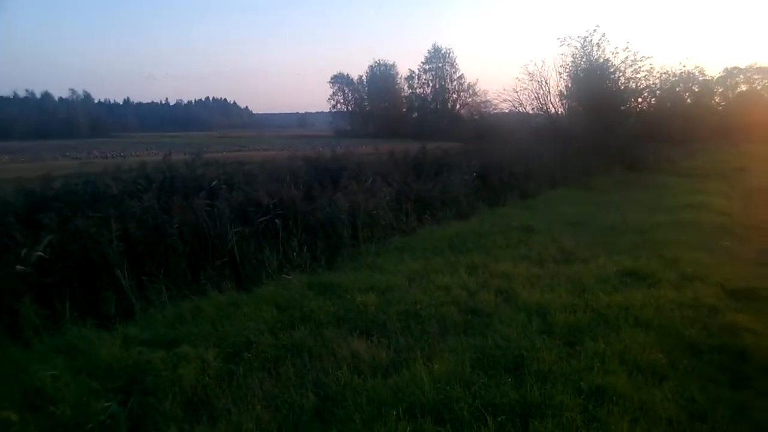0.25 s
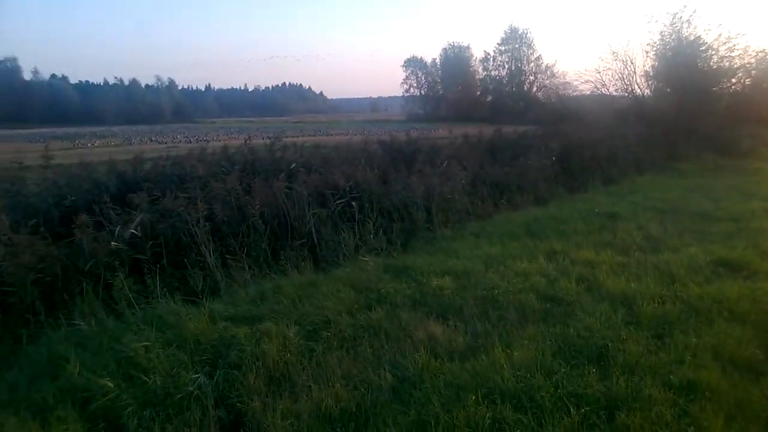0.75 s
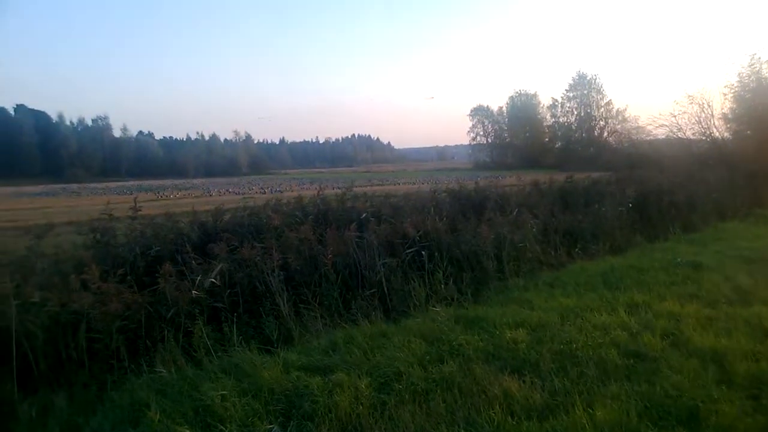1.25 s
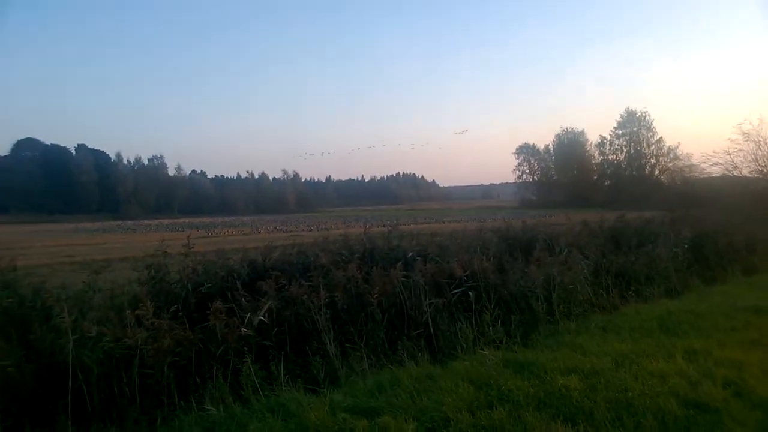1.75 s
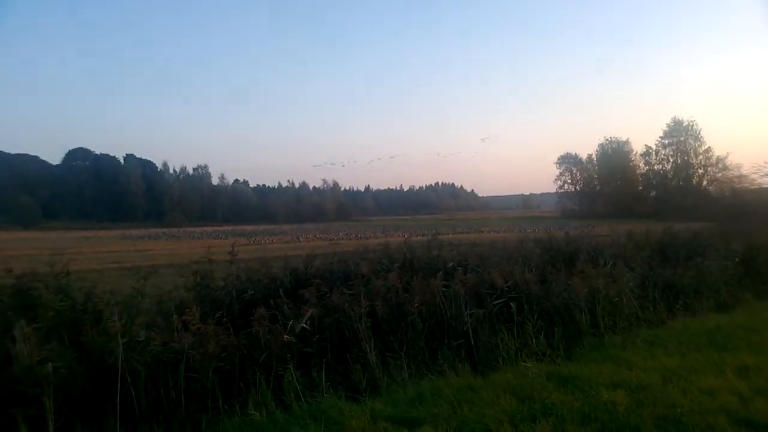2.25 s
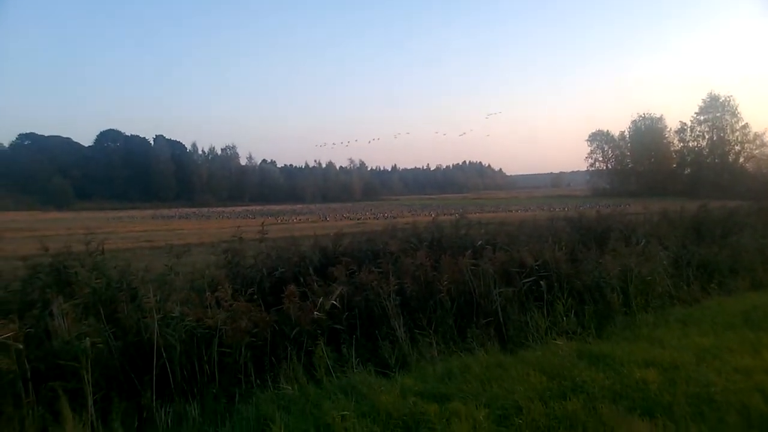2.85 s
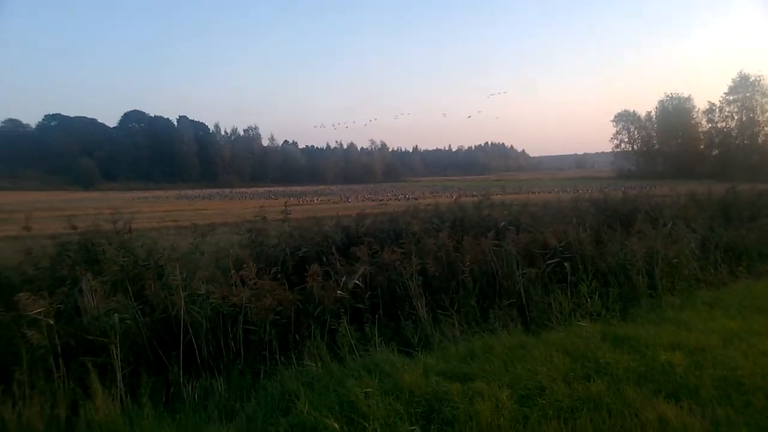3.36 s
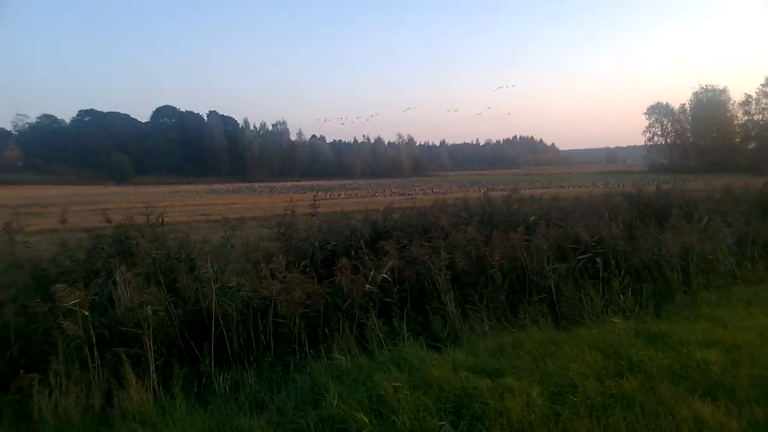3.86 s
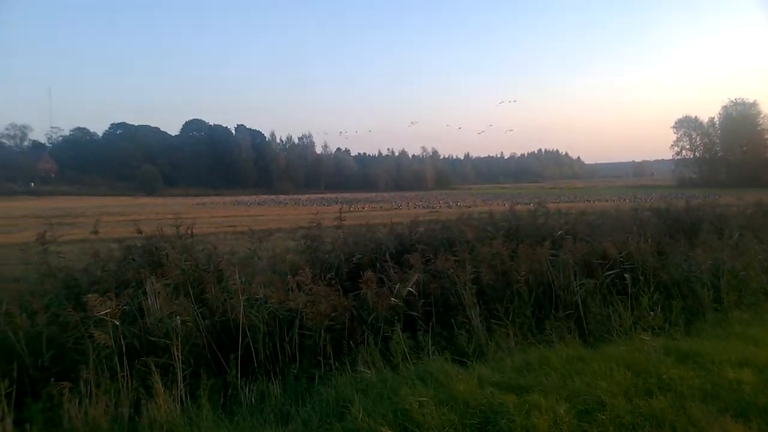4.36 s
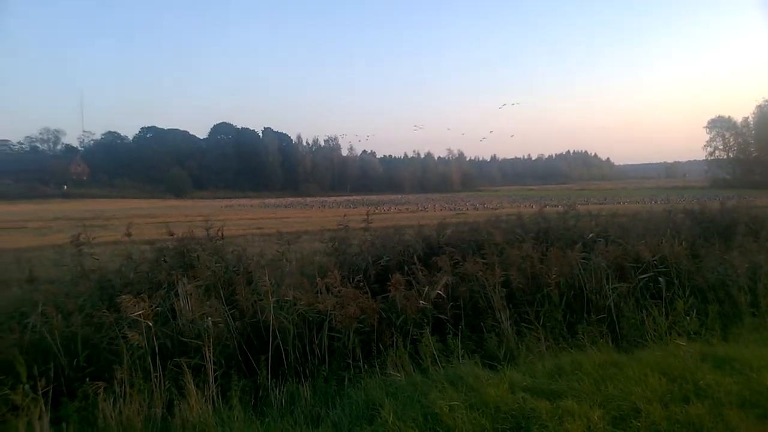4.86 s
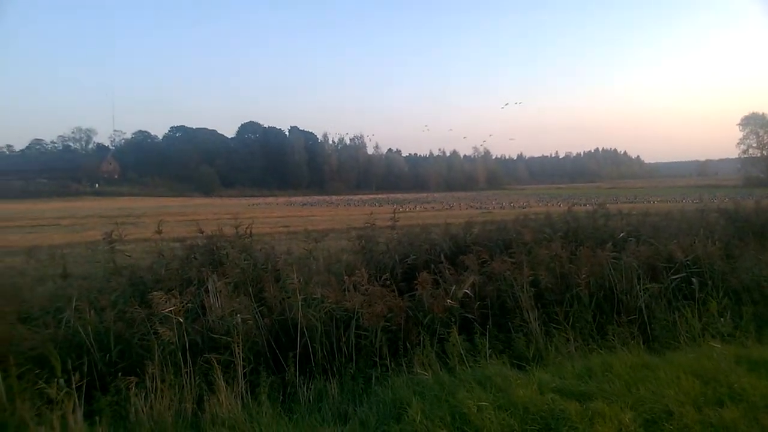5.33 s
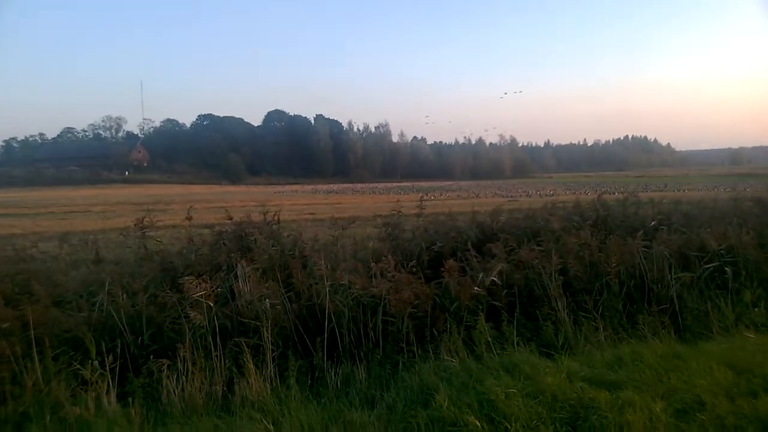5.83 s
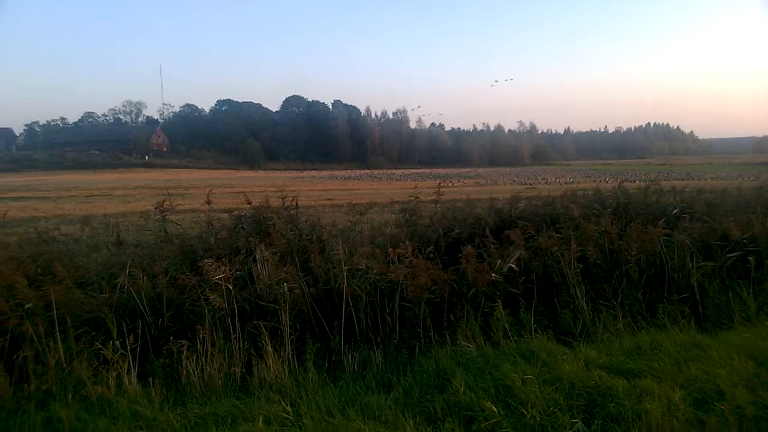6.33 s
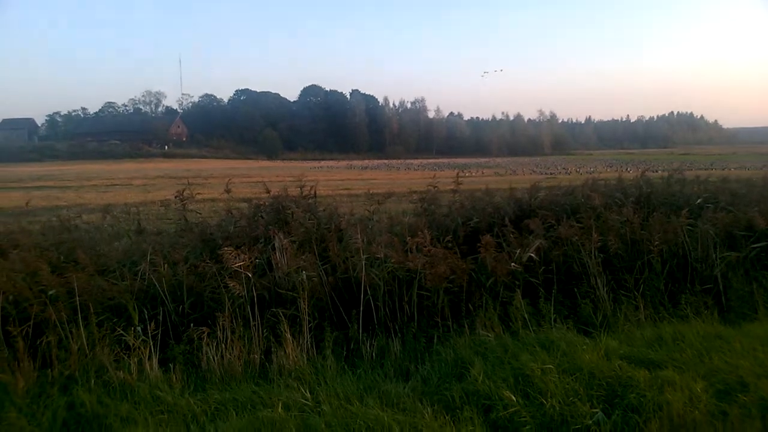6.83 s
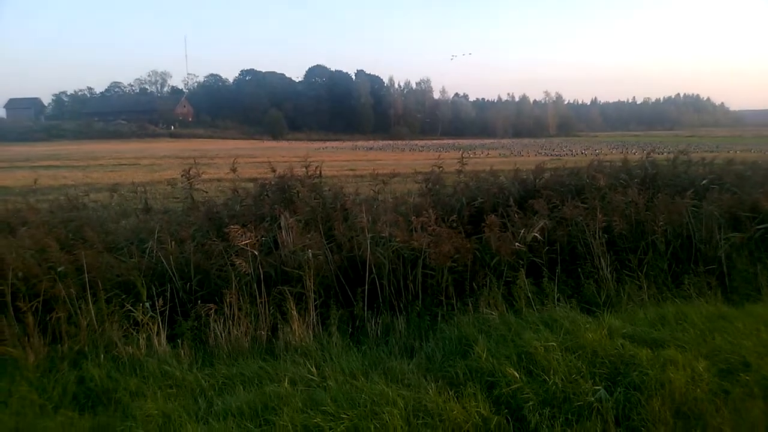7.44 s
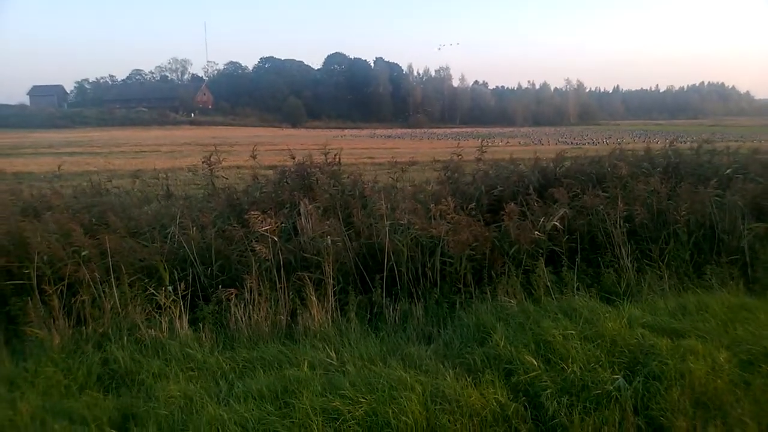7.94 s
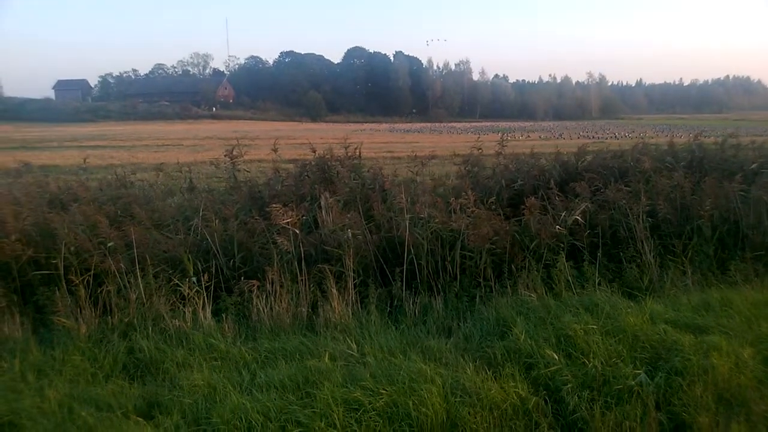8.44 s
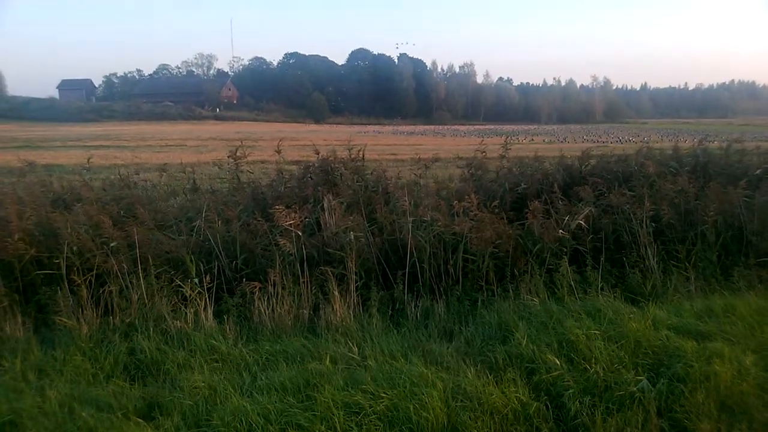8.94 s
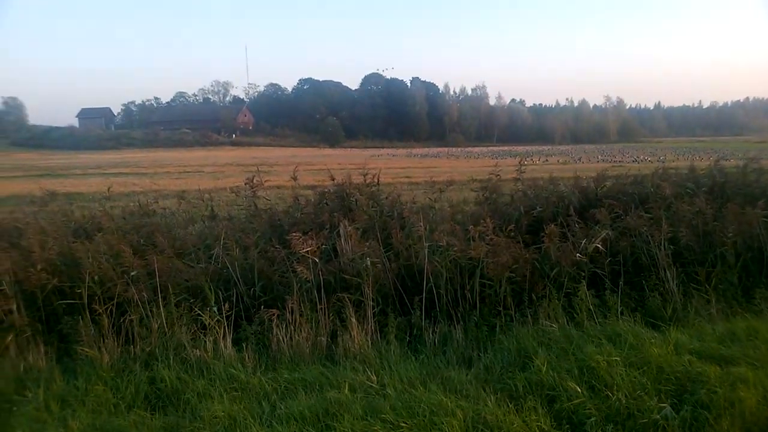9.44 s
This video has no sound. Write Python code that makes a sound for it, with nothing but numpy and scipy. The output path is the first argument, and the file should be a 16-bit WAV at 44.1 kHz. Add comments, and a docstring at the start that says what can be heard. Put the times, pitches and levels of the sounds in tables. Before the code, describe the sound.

A large flock of geese honks without pause across an open field at dusk, hoarse overlapping calls over a dense distant chorus.

```python
"""Open fields at dusk, heard from behind a reed bed: a large flock of geese calls.
Each call is a pulse train whose pitch arches and drops, shaped by throat and beak; most are hoarse, some clear.
Every hoarse honk that stands out sets off three neighbours, so the flock surges over a distant chorus.
Field and forest edge answer with decaying noise. Beneath lie filtered-noise air and rumble and a sine hum;
a thin noise fizz comes and goes high in the treble, with a brief whine and a few ticks."""
import sys
import numpy as np
from scipy import signal
from scipy.fft import rfft, irfft, next_fast_len
from scipy.io import wavfile
from scipy.ndimage import map_coordinates

SR = 44100
rng = np.random.default_rng(int(sys.argv[2]) if len(sys.argv) > 2 else 0)


def output_pcm(signal):
    """Save a mono or channel-first signal as 16-bit PCM at the path in sys.argv[1].

    Samples are clipped to [-1, 1] before scaling.
    """
    pcm = np.clip(np.atleast_2d(signal).T, -1, 1) * 32767
    wavfile.write(sys.argv[1], SR, np.round(pcm).astype(np.int16))


N = 427329

FLOCK_PITCH_HZ = 860.8  # typical call

# hoarse honks that stand out; level is that of the body before its swell, roughness is clipped to 0-1:
# start_s, length_s, pitch_hz, level_db, roughness, brass_vs_body_db, throat_hz
HOARSE_HONKS = [(-0.005, 0.18, 894, -43.5, 1.09, -15, 1970.0), (0.205, 0.14, 859, -47, 0.82, -20, 2240),
                (0.383, 0.079, 941, -46, 1.05, -15, 1830), (0.626, 0.094, 801, -55, 0.08, -24.7, 2250),
                (0.71, 0.096, 807, -47.5, 0.8, -14.5, 1940), (0.791, 0.14, 804, -48.5, 0.92, -21, 2100),
                (0.921, 0.096, 862, -44, 0.87, -28, 1760), (0.984, 0.096, 929, -49.5, 0.64, -11, 2320),
                (1.063, 0.13, 943, -47.5, 0.79, -15, 2570), (1.179, 0.088, 1088, -38.5, 0.93, -25, 1960),
                (1.35, 0.17, 875, -42.5, 0.71, -17.1, 2160), (1.488, 0.13, 830, -42.5, 0.57, -16, 1900),
                (1.801, 0.11, 847, -44, 0.57, -30, 2120), (1.839, 0.11, 966, -50, 0.4, -3.5, 2080),
                (1.978, 0.099, 1022, -43, 0.89, -17, 2210), (2.043, 0.11, 893, -43, 1.02, -33, 2000),
                (2.187, 0.18, 880, -44.5, 0.34, -16.5, 2100), (2.249, 0.075, 904, -39, 0.92, -17, 1990),
                (2.319, 0.2, 880, -45.5, 0.88, -29, 1880), (2.478, 0.14, 850, -47.5, 0.6, -25, 1880),
                (2.606, 0.11, 810, -44.5, 0.47, -43, 1790), (2.834, 0.091, 844, -42, 0.82, -15, 2380),
                (2.928, 0.12, 853, -50, 0.26, -15, 1670), (3.031, 0.065, 875, -39.5, 0.85, -25, 2080),
                (3.043, 0.12, 807, -44.5, 0.53, -13, 1850), (3.131, 0.16, 816, -43.5, 0.43, -29, 2040),
                (3.27, 0.092, 830, -41, 0.38, -36, 2010), (3.617, 0.18, 911, -42.5, 0.55, -20, 2010),
                (3.772, 0.11, 1025, -41.5, 0.66, -14.5, 1990), (3.823, 0.16, 790, -42, 0.59, -23, 2090),
                (3.917, 0.21, 829, -43, 0.69, -23, 2040), (4.185, 0.09, 893, -42, 0.58, -23.5, 1920),
                (4.323, 0.078, 783, -43, 0.68, -17, 2060), (4.387, 0.12, 927, -49, 1.12, -3.5, 2150),
                (4.497, 0.084, 804, -41.5, 0.48, -14, 1970), (4.546, 0.12, 865, -41, 0.4, -17, 2070),
                (4.669, 0.11, 709, -42, 0.98, -21, 2070), (4.804, 0.11, 750, -61, 0.82, 9, 2270),
                (4.845, 0.13, 874, -44, 0.5, -19, 2270), (5.007, 0.084, 940, -40, 0.6, -20, 1830),
                (5.08, 0.14, 787, -40.0, 0.76, -30, 1920), (5.172, 0.11, 835, -40.5, 0.7, -26, 1800),
                (5.256, 0.16, 847, -40.5, 0.67, -19.5, 2010), (5.462, 0.19, 777, -45.5, 0.63, -11, 2120),
                (5.614, 0.18, 934, -39, 0.86, -17.5, 1880), (5.749, 0.17, 820, -41, 0.74, -14.5, 2200),
                (5.849, 0.19, 769.5, -43.5, 0.57, -11, 2200), (6.02, 0.14, 874, -42.5, 0.83, -22.5, 2100),
                (6.241, 0.1, 725, -38, 0.65, -9, 2320), (6.282, 0.12, 811, -42, 0.41, -15.5, 2100),
                (6.361, 0.196, 816, -37.5, 0.74, -14, 2000), (6.494, 0.088, 827, -46.5, 0.85, -11, 2230),
                (6.545, 0.074, 932, -50, 0.45, -2, 2340), (6.704, 0.096, 772, -43.5, 0.33, -31, 2340),
                (6.882, 0.098, 792.5, -37, 0.77, -18.5, 2150), (6.96, 0.072, 785, -61, 0.4, -22, 1750),
                (7.055, 0.14, 819, -39, 0.72, -12, 2170), (7.178, 0.17, 986, -39.5, 0.88, -16, 2280),
                (7.38, 0.19, 834.4, -37, 0.6, -23, 2070), (7.435, 0.1, 930, -47, 0.74, -4, 2180),
                (7.556, 0.13, 893, -39, 0.7, -18, 2220), (7.659, 0.077, 738, -50, 0.27, -20, 1730),
                (7.814, 0.1, 863, -39, 0.87, -25, 2170), (7.939, 0.086, 1020, -48.5, 0.92, -13.5, 2020),
                (8.007, 0.12, 944, -43, 0.86, -26, 2080), (8.159, 0.13, 846, -42, 0.6, -13, 2130),
                (8.396, 0.099, 902, -44.5, 0.9, -21.5, 2500), (8.566, 0.12, 850, -43.5, 0.87, -8.5, 2300),
                (8.773, 0.12, 884, -45, 0.67, -26, 2290.0), (8.845, 0.099, 904, -44.5, 0.7, -23, 2310.0),
                (8.916, 0.1, 1020, -41.5, 0.76, -13, 2200), (9.127, 0.087, 863, -42, 0.49, -25, 2210.0),
                (9.294, 0.107, 771, -47, 1.2, -17.4, 1740), (9.429, 0.17, 847, -44, 0.64, -21.5, 2150)]


def near_geese():
    """Hoarse honks that stand out, each a rough pulse train through throat and beak."""
    track = np.zeros(N)
    for start_s, length_s, pitch_hz, level_db, rough, bright_db, throat_hz in HOARSE_HONKS:
        call = honk(start_s, length_s, pitch_hz, rough, throat_hz, bright_db)
        add(track, start_s, amp(level_db) * call)
    return track


def honk(start_s, length_s, pitch_hz, rough, throat_hz, bright_db, rise=0.0692):
    """One hoarse call: rough membrane pulses through throat and beak."""
    u = np.linspace(0, 1, int(max(length_s, .04) * SR))
    rough = np.clip(rough, 0, 1)
    source = syrinx(u, pitch_hz, fall(pitch_hz, rough), rough, rise)
    # the hoarser the call, the more overtones it spreads over
    width_hz = 400 * (1 + .7 * rough)
    reflected = .3 * paths(source, spread_s=0.0081)
    body = throat(source + reflected, start_s, pitch_hz, throat_hz, width_hz)
    # air rushing past the membrane rasps in the overtones
    rasp = 1 + 0.29 * rough * wobble(2500, len(u))
    brass = beak(paths(source * rasp, spread_s=0.0031))
    return swell(u, body, amp(bright_db) * brass)


# clear cries; level of the body before its swell is 2 dB above relative_level_db,
# brass_vs_body is 1.5 dB above relative_brass_db:
# start_s, length_s, pitch_hz, relative_level_db, pitch_drop_share, throat_hz, relative_brass_db
CLEAR_CRIES = [(.134, 0.085, 1086, -46.5, 0.054, 2150, -13.5), (.25, 0.04, 863, -49, 0.075, 1720, -28),
               (.39, 0.097, 1089, -52, 0.16, 2800, -10.5), (.8, 0.066, 1146, -46.5, 0.15, 2300, -26),
               (1.235, 0.038, 783, -45, .14, 1470, -25), (1.575, 0.094, 792, -49.5, 0.091, 1550, -32),
               (1.66, 0.09, 1124, -48.5, 0.27, 2100, -24.5), (2.418, 0.098, 933, -46.5, 0.07, 2300, -11.5),
               (2.86, 0.076, 741, -44.5, 0.1, 2180, -13), (3.15, 0.11, 825, -46.5, 0.064, 1630, -16),
               (3.362, 0.049, 977, -47, .12, 2360, -25), (3.469, 0.076, 937, -44, 0.11, 2240, -13.5),
               (3.515, 0.069, 740, -53, .04, 1520, -34), (3.935, .075, 854, -45.5, 0.13, 1660, -9),
               (4.07, 0.065, 908, -49.5, 0.19, 2440, -20), (4.405, 0.043, 915, -43, 0.039, 1880, -27),
               (4.71, 0.076, 712, -46, 0.02, 2130, -18), (5.095, 0.097, 825, -45.5, 0.19, 2400, -27),
               (5.35, 0.056, 782, -45.5, 0.13, 1610, -18), (5.48, 0.072, 775, -50, 0.11, 1550, -7),
               (5.92, 0.076, 771, -44, 0.15, 2320, -19), (6.07, 0.079, 737, -42, 0.18, 2240, -26.5),
               (6.183, 0.077, 1103, -41.5, 0.11, 2190, -22.5), (6.42, 0.1, 1100, -39.5, 0.13, 2110, -35),
               (6.751, .08, 753, -40.5, 0.128, 2530, -20.5), (6.905, 0.063, 710, -42, .09, 2160, -20),
               (7.04, 0.066, 762, -40.5, 0.23, 2250, -18.5), (7.39, 0.072, 987, -40.5, 0.048, 1980, -27),
               (7.575, 0.091, 887, -41.5, 0.025, 1800, -31), (7.835, 0.093, 870, -47, 0.076, 2530, -13),
               (8.03, 0.12, 956, -42, 0.067, 2450, -10), (8.255, 0.076, 907, -41, 0.14, 2470, -19),
               (8.475, 0.085, 866, -47, 0.073, 2330, -41), (8.605, 0.072, 782, -40, 0.15, 2080, -34),
               (8.72, 0.068, 845, -44, 0.067, 2070, -34), (8.955, .1, 989, -43, 0.18, 2680, -12.5),
               (9.145, 0.07, 870, -47.5, .1, 1780, -29), (9.236, 0.064, 852, -42, 0.18, 2250, -30),
               (9.566, .072, 837, -43.5, 0.054, 2050, -21.5)]


def clear_cries(gain_db=2.0, brass_gain_db=1.5, rise_per_drop=0.482, width_hz=340):
    """Nearly clean calls: narrow throats ring out one or two overtones; the brass flickers and rasps."""
    track = np.zeros(N)
    rough, rasp_depth, reflected_gain = .18, .45, .45
    for start_s, length_s, pitch_hz, level_db, drop, throat_hz, bright_db in CLEAR_CRIES:
        u = np.linspace(0, 1, int(length_s * SR))
        source = syrinx(u, pitch_hz, drop, rough, rise_per_drop * drop)
        source = source + reflected_gain * paths(source, spread_s=.004)
        body = throat(source, start_s, pitch_hz, throat_hz, width_hz)
        brass = beak(source * (1 + rasp_depth * wobble(900, len(u))))
        call = swell(u, body, amp(bright_db + brass_gain_db) * brass)
        add(track, start_s, amp(level_db + gain_db) * call)
    return track


def fall(pitch_hz, rough):
    """Share by which the pitch drops: high and hoarse calls sink furthest."""
    base_drop, hoarse_drop, drop_per_octave = 0.1117, 0.0776, 0.354
    octaves_above = np.maximum(np.log2(pitch_hz / FLOCK_PITCH_HZ), 0)
    high_drop = drop_per_octave * octaves_above * (.5 + rough)
    return np.clip(base_drop + hoarse_drop * rough + high_drop, 0, .5)


def syrinx(u, pitch_hz, drop, rough, rise):
    """Membrane pulses over a call (u from 0 to 1): the pitch rises a little, holds, then drops."""
    crest, wander, jitter, rasp_db, harmonics = .35, 0.013, .1, 6.5, 13
    before = np.clip(1 - u / crest, 0, 1)
    after = np.clip((u - crest) / (1 - crest), 0, 1)
    arch = 1 - rise * before ** 2 - drop * after ** 2.55
    # the membrane is chaotic under full pressure and settles as the call ends
    chaos = rough * np.clip(2.4 * (1 - u), 0, 1)
    unsteady = 1 + wander * rough * wobble(95.3, len(u)) + jitter * chaos * wobble(600.6, len(u))
    phase = 2 * np.pi * np.cumsum(pitch_hz * arch * unsteady) / SR + rng.uniform(0, 2 * np.pi)
    # closed form of equal-strength harmonics
    pulses = np.sin((harmonics + .5) * phase) / np.sin(phase / 2) - 1
    # uneven and alternating pulse sizes fill the gaps between the harmonics
    uneven = amp(rasp_db * chaos * np.tanh(wobble(447.8, len(u))))
    alternating = 1 + chaos * np.cos(phase / 2)
    return pulses * uneven * alternating


# strong low part of a goose's voice: frequency_hz, relative_db
VOICE_RESPONSE = [(450, -62), (620, -11), (740, -9.5), (880, -6.5), (1250, -5), (1520, -1.5), (2100, 2.5),
                  (2680, -0.5), (3050, -4.5), (4200, -4.5), (5500, -21)]
# ground reflection's lift of the fundamental, before each bird's own offset: time_s, base_lift_db
GROUND_LIFT = [(1.5, -1), (2.3, 3.5), (3.3, -1.5), (3.5, 12.5), (3.7, -3.5), (4.1, 10), (4.8, 1.5)]


def throat(source, start_s, pitch_hz, throat_hz, width_hz):
    """Body at rms 1: one throat resonance; ground reflection sets the fundamental, varied per bird."""
    ground_db = np.interp(start_s, *np.transpose(GROUND_LIFT)) + rng.uniform(-6, 2.2)

    def response(hz):
        fundamental = np.exp(-(hz / (1.4 * pitch_hz)) ** 6)
        resonance = 1 / (1 + ((hz - throat_hz) / width_hz) ** 2)
        return amp(along(VOICE_RESPONSE, hz) + ground_db * fundamental) * resonance

    return unit(filtered(source, response))


# brassy upper part of the voice: frequency_hz, relative_db
BRASS_RESPONSE = [(2500, -1.5), (3800, -4), (4700, -6), (5800, -5.5), (6600, -11), (8000, -17.5),
                  (10000, -18.5), (12000, -30.5)]


def beak(source, beak_hz=5680, width_hz=950):
    """Brass at rms 1: overtones through the open beak's resonance, tuned a little differently per call."""
    own_hz = beak_hz * np.exp(.05 * rng.standard_normal())

    def response(hz):
        return amp(along(BRASS_RESPONSE, hz)) / np.hypot(1, (hz - own_hz) / width_hz)

    return unit(filtered(source, response))


def swell(u, body, brass):
    """Abrupt start, fade with the falling pitch; overtones open unevenly at the loudest point."""
    effort = np.abs(np.sin(np.pi * u))
    abrupt = .42
    spurts = unit(amp(.8 * wobble(70, len(u))))
    envelope = effort ** (abrupt + (1 - abrupt) * u)
    return envelope * (body + effort ** (0.37 + u) * spurts * brass)


def paths(x, spread_s):
    """Many slightly unequal paths over reeds and stubble smear the pulses and colour each call anew."""
    t = np.arange(SR // 80) / SR
    arrivals = rng.standard_normal(len(t)) * np.exp(-t / spread_s)
    return signal.fftconvolve(x, arrivals / np.linalg.norm(arrivals))[:len(x)]


def neighbours(gain_db=-3.5, bright_db=-27, late_s=.004, count=3):
    """A few birds join in one after another with every hoarse honk, and stop just after it."""
    spans, turn = [], np.linspace(0, 1, count)
    typical_length_s = .08
    chances = rng.uniform(0, 1, (len(HOARSE_HONKS), count))
    for (start_s, length_s, *_), chance in zip(HOARSE_HONKS, chances):
        own_s = np.minimum(typical_length_s * 2 ** (chance - .5), length_s)
        spans += zip(start_s + turn * (length_s + late_s - own_s), own_s)
    return amp(gain_db) * flock(spans, .24, bright_db)


def distant_chorus(gain_db=-7.5, bright_db=-22, length_s=0.074, count=420):
    """The rest of the flock calls without pause, at jittered even spacing, dulled by the air."""
    slots = (np.arange(count) + rng.uniform(0, 1, count)) / count
    starts_s = slots * N / SR - length_s / 2
    return amp(gain_db) * flock([(s, length_s) for s in starts_s], .42, bright_db)


# flock level contour, before each group's gain: time_s, relative_level_db
FLOCK_LEVEL = [(0, -41.5), (1, -46.5), (2.3, -42), (4.8, -45.5), (6, -41), (8.4, -44), (9.69, -47.5)]
# centre of the flock's throat resonances, before the 0.88 share: time_s, base_throat_hz
FLOCK_THROAT = [(0, 2025), (5.4, 2180), (9.0, 2290), (9.69, 2250)]


def flock(spans, rough, bright_db, throat_share=0.88, voice_spread=.2, spread_db=2.5):
    """One call per (start_s, length_s), each bird with its own voice and distance, on the flock level."""
    track = np.zeros(N)
    draws = rng.uniform(-1, 1, (len(spans), 4))
    for (start_s, length_s), (pitch_draw, throat_draw, rough_draw, level_draw) in zip(spans, draws):
        pitch_hz = FLOCK_PITCH_HZ * np.exp(voice_spread * pitch_draw)
        base_hz = np.interp(start_s, *np.transpose(FLOCK_THROAT))
        throat_hz = throat_share * base_hz * np.exp(voice_spread * throat_draw)
        own_rough = rough * (1 + .5 * rough_draw)
        call = honk(start_s, length_s, pitch_hz, own_rough, throat_hz, bright_db, rise=.1)
        add(track, start_s, amp(spread_db * level_draw) * call)
    level_db = np.interp(np.arange(N) / SR, *np.transpose(FLOCK_LEVEL))
    return unit(track) * amp(level_db)


# scatter from field and trees: frequency_hz, t60_s
SCATTER_DECAY = [(500, 0.77), (2000, 0.13), (8000, 0.089)]


def scatter(x):
    """Short diffuse answer of stubble, reeds and trees: noise decaying at its own rate per frequency."""
    hz, t, z = signal.stft(rng.standard_normal(SR // 2), SR, nperseg=256)
    decay = amp(-60 * t / along(SCATTER_DECAY, hz)[:, None])
    tail = signal.istft(z * decay, SR, nperseg=256)[1]
    return signal.fftconvolve(x, tail / np.linalg.norm(tail))[:N]


# fizz swells, peak level before flutter: centre_s, level_db
FIZZ_SWELLS = [(4.296, -73.5), (5.0, -73), (5.721, -66.5), (5.95, -66), (6.316, -67), (6.964, -67),
               (7.119, -66.5), (7.828, -67), (8.96, -66.5), (9.258, -71)]


def high_fizz(fizz_hz=14600, width_hz=1500, length_s=0.28, rest_db=-90, flutter_db=3.5):
    """Brief swells of very high band noise, and a thin fluttering sine whine for a while."""
    t = np.arange(N) / SR
    gain = np.full(N, amp(rest_db))
    for centre_s, level_db in FIZZ_SWELLS:
        add(gain, centre_s - length_s / 2, amp(level_db) * np.hanning(int(length_s * SR)))
    noise = rng.standard_normal(N)
    fizz = unit(filtered(noise, lambda hz: np.exp(-((hz - fizz_hz) / width_hz) ** 2 / 2)))
    fizz = gain * amp(flutter_db * wobble(30, N)) * fizz
    whine_hz, whine_db, whine_from_s, whine_to_s = 15000, -77, 5.1, 6.8
    gate = np.clip(20 * np.minimum(t - whine_from_s, whine_to_s - t), 0, 1)
    whine = gate * unit(np.sin(2 * np.pi * whine_hz * t))
    return fizz + amp(whine_db + flutter_db * wobble(9, N)) * whine


# tiny ticks, level before envelope and high-pass: start_s, level_db
TICK_EVENTS = [(1.112, -49.5), (2.718, -57.5), (6.04, -46)]


def ticks(rise_s=0.0043, decay_s=0.0078, low_hz=5000):
    """A few faint, dry, very high ticks: short high-passed noise bursts."""
    track, t = np.zeros(N), np.arange(SR // 20) / SR
    envelope = np.exp(-t / decay_s) * (1 - np.exp(-t / rise_s))
    for start_s, level_db in TICK_EVENTS:
        add(track, start_s, amp(level_db) * envelope * rng.standard_normal(len(t)))
    return filtered(track, lambda hz: 1 - np.exp(-(hz / low_hz) ** 4))


# still evening air: frequency_hz, relative_db
AIR_SPECTRUM = [(15, -14.5), (42, 1.5), (75, -4.5), (150, -12.5), (230, -11), (450, -18), (1000, -8.5),
                (3000, -27), (6000, -23.5), (8500, -30), (12000, -41), (15000, -38.5)]
# rumble contour, used as deviation from its mean: time_s, relative_db
RUMBLE_LEVEL = [(0.94, -68), (1.0, -55.5), (1.05, -69), (3.75, -74), (6.45, -70), (8.74, -73)]
# faint hum: frequency_hz, level_db
HUM_TONES = [(92, -77.5), (279, -82.5)]


def background(air_db=-64.0, sway_db=1.13, rumble_hz=130, rumble_share=0.98):
    """Low rumble and soft hiss from shaped noise, with a sine hum of slightly unsteady phase."""
    t = np.arange(N) / SR
    air = unit(filtered(rng.standard_normal(N), lambda hz: amp(along(AIR_SPECTRUM, hz))))
    rumble = filtered(air, lambda hz: np.exp(-(hz / rumble_hz) ** 2))
    hiss = air - rumble
    rumble_db = np.interp(t, *np.transpose(RUMBLE_LEVEL))
    air = hiss + rumble * amp(rumble_share * (rumble_db - rumble_db.mean()))
    hum = np.zeros(N)
    for hz, level_db in HUM_TONES:
        hum += amp(level_db) * unit(np.sin(2 * np.pi * hz * t + wobble(5.5, N)))
    return amp(air_db + sway_db * wobble(9, N)) * air + hum


def amp(db):
    """Decibels to gain."""
    return 10 ** (np.asarray(db) / 20)


def unit(x):
    """x at rms 1."""
    return x / np.sqrt(np.mean(x ** 2) + 1e-20)


def along(points, hz):
    """(frequency_hz, value) points read on a log axis."""
    f, v = np.transpose(points)
    return np.interp(np.log(hz + 1), np.log(f + 1), v)


def wobble(rate_hz, size):
    """A smooth random curve with rate_hz knots a second."""
    knots = rng.standard_normal(int(size * rate_hz / SR) + 4)
    return map_coordinates(knots, [np.arange(size) * rate_hz / SR], order=2)


def filtered(x, response):
    """x times a response of frequency, zero-padded."""
    m = next_fast_len(len(x) + 1024, True)
    return irfft(rfft(x, m) * response(np.fft.rfftfreq(m, 1 / SR)), m)[:len(x)]


def add(track, start_s, sound):
    """Mix a sound into the track from start_s, cut at both ends of the track."""
    start = round(start_s * SR)
    part = sound[max(-start, 0):max(len(track) - start, 0)]
    track[max(start, 0):][:len(part)] += part


def scene(near_wet_db=-20, far_wet_db=-15):
    """Near and far birds with their scatter, over the quiet field."""
    near = near_geese() + clear_cries()
    far = neighbours() + distant_chorus()
    echoes = scatter(amp(near_wet_db) * near + amp(far_wet_db) * far)
    return (near + far + echoes + high_fizz() + ticks() + background())[None]


def record(dry, top_hz=15800):
    """Band limit: nothing is kept from top_hz upward."""
    return filtered(dry[0], lambda hz: hz < top_hz)[None]


dry = scene()
out = record(dry)
output_pcm(out)
```